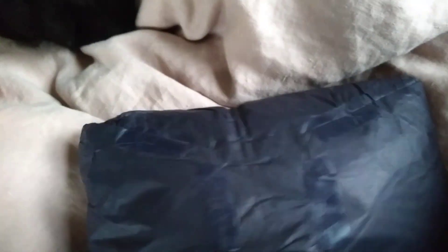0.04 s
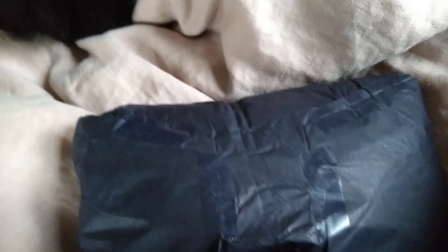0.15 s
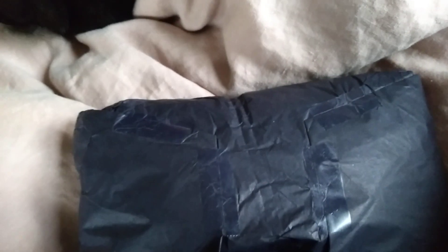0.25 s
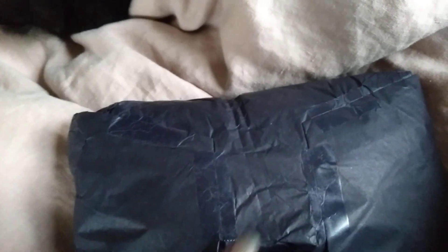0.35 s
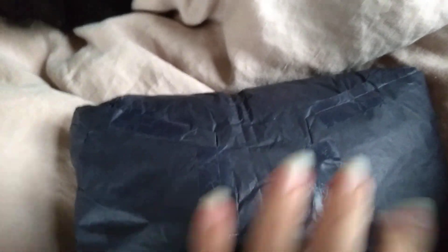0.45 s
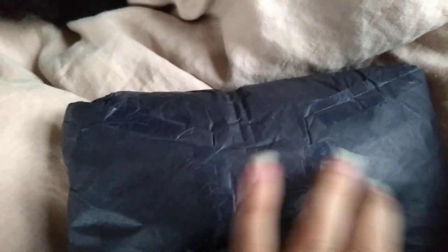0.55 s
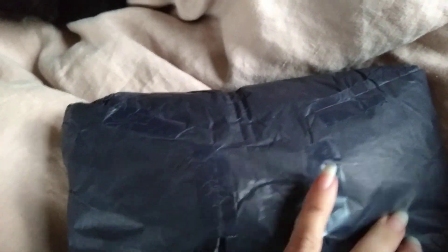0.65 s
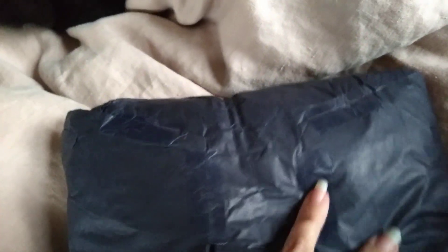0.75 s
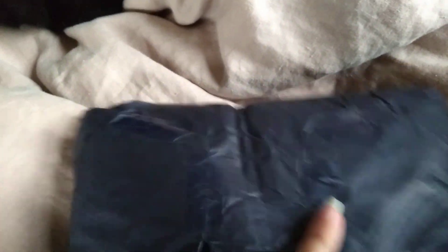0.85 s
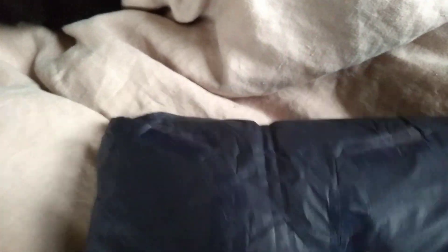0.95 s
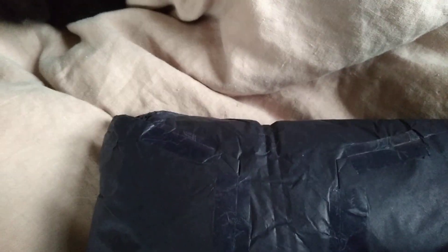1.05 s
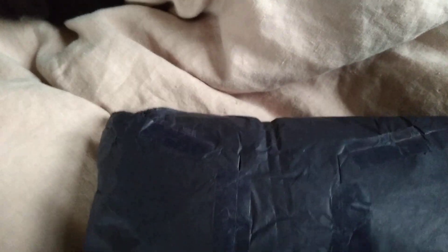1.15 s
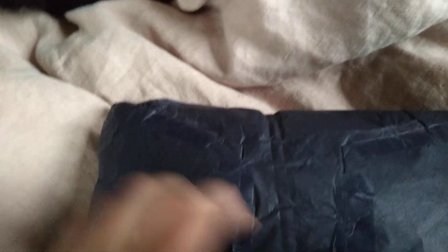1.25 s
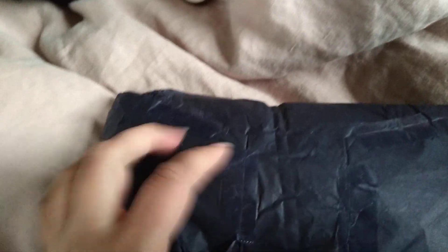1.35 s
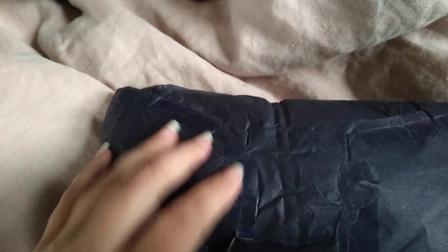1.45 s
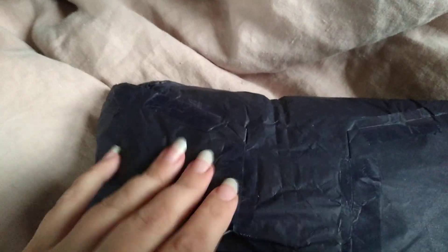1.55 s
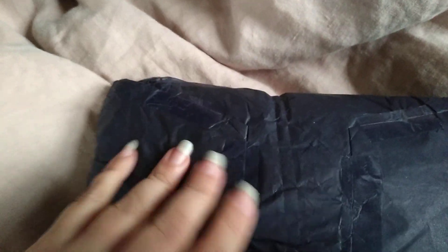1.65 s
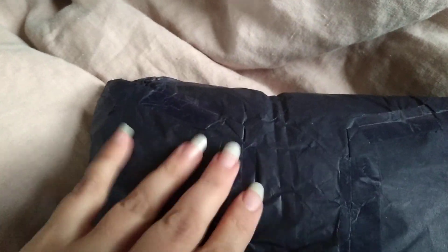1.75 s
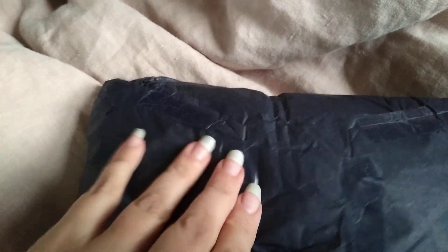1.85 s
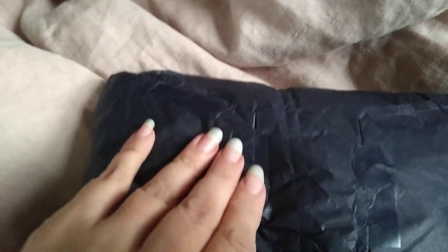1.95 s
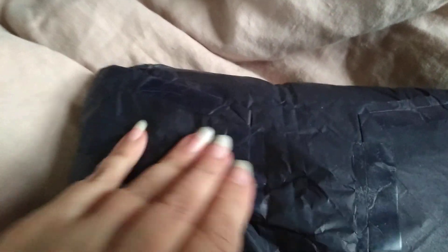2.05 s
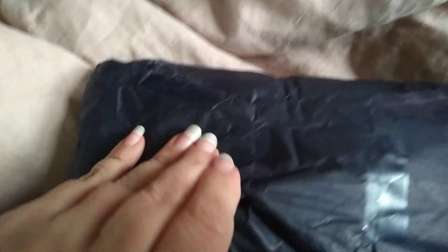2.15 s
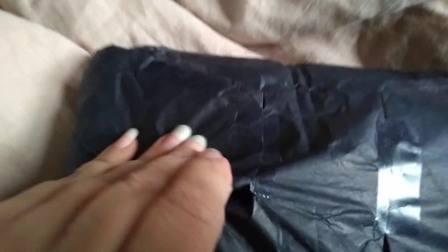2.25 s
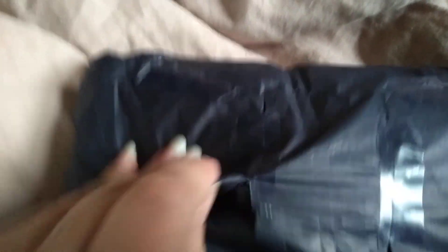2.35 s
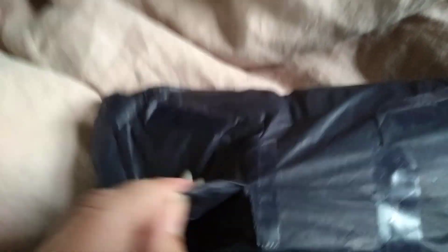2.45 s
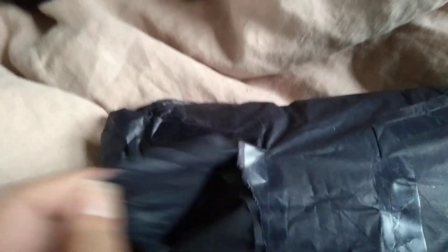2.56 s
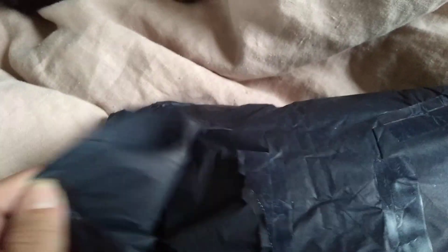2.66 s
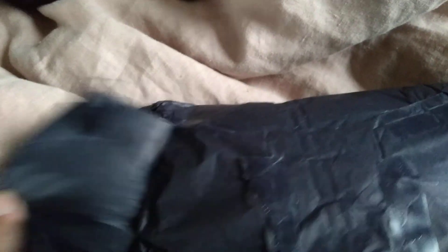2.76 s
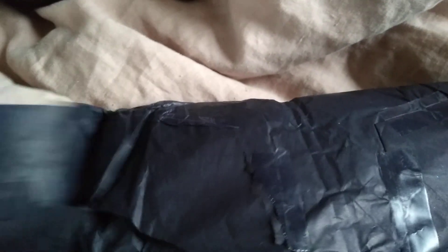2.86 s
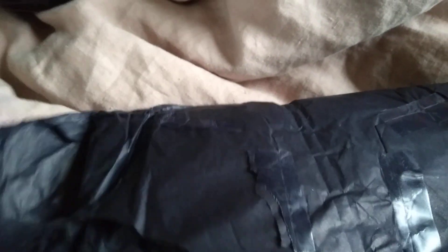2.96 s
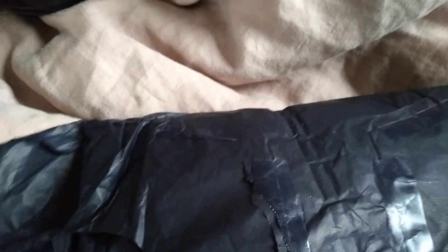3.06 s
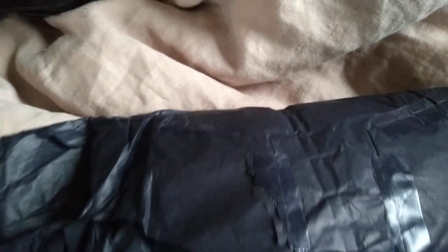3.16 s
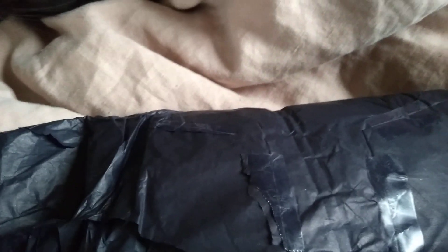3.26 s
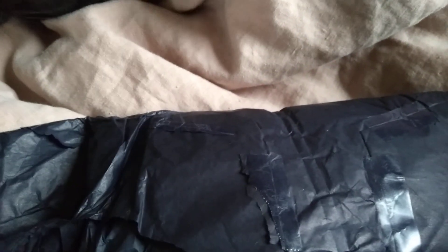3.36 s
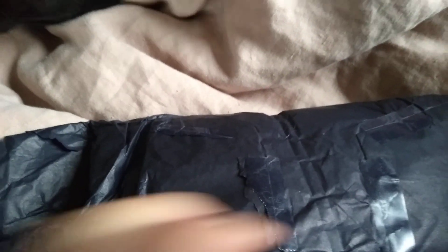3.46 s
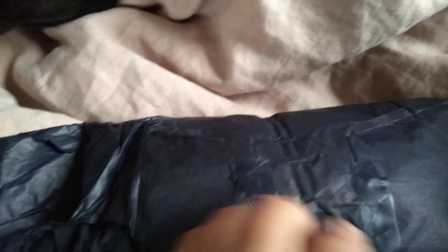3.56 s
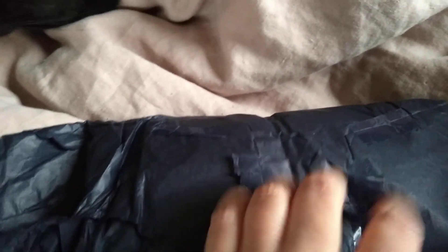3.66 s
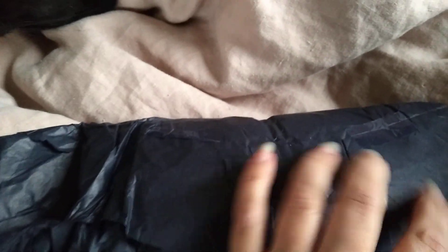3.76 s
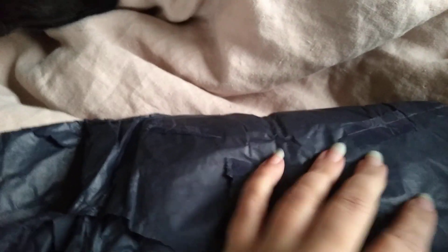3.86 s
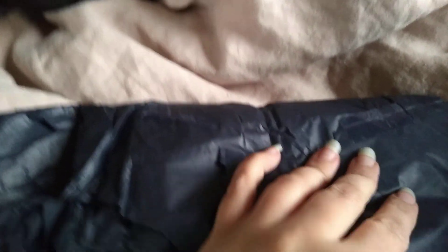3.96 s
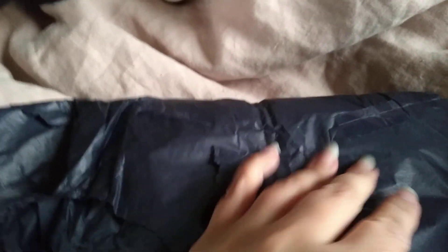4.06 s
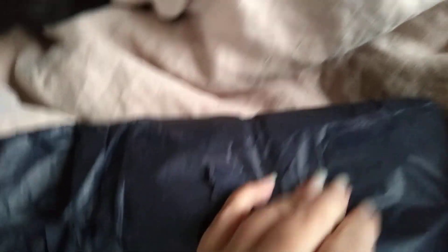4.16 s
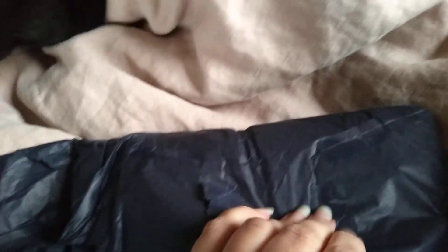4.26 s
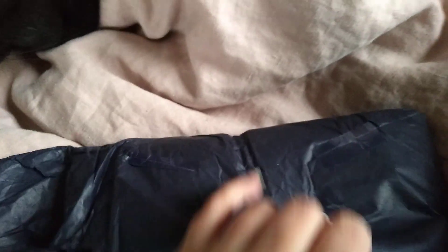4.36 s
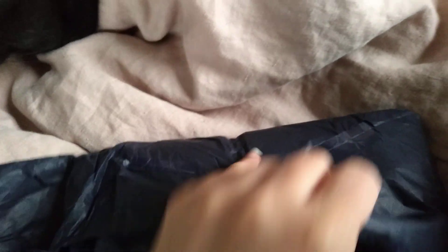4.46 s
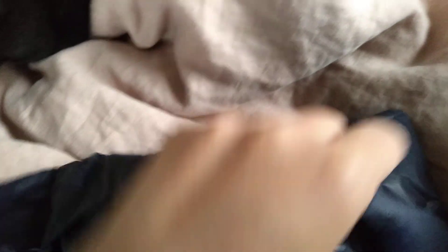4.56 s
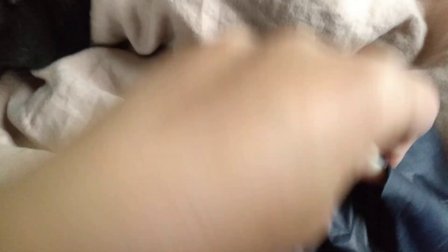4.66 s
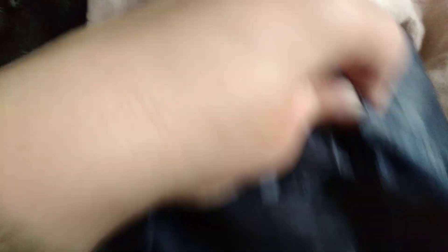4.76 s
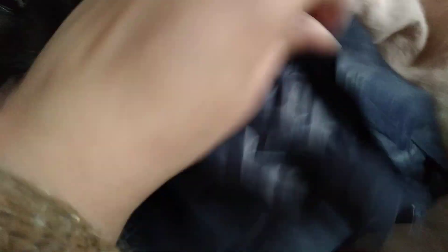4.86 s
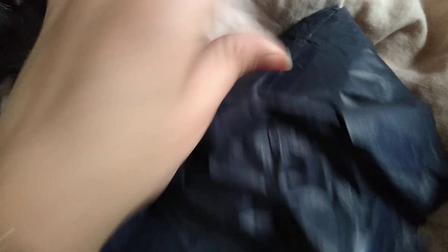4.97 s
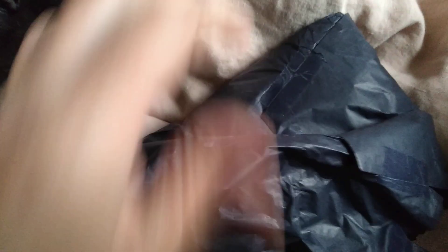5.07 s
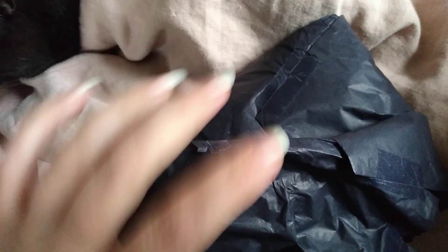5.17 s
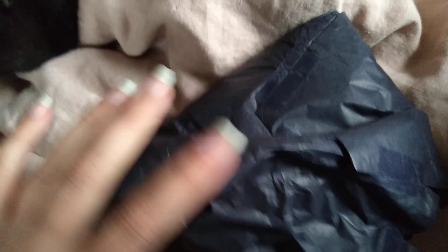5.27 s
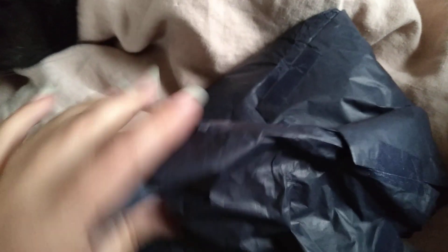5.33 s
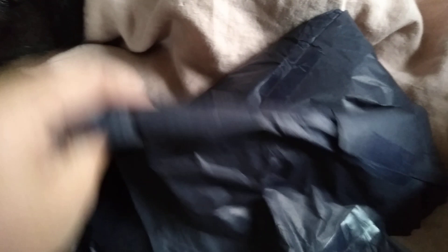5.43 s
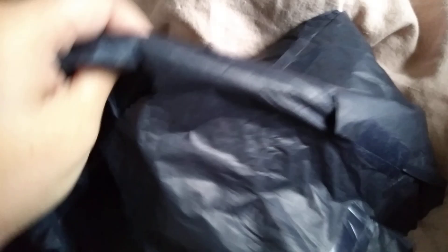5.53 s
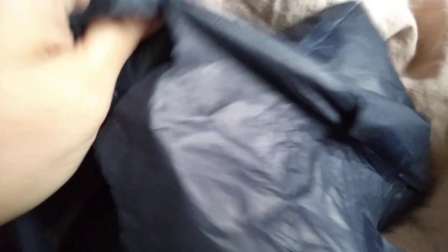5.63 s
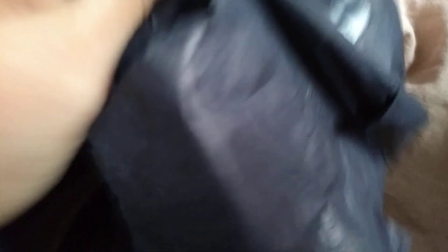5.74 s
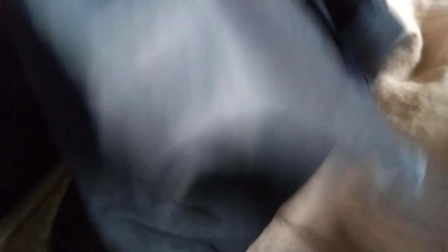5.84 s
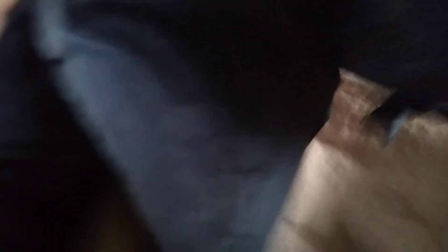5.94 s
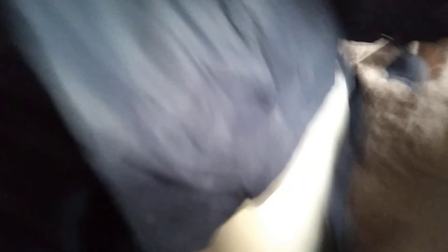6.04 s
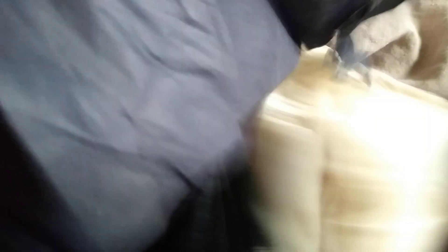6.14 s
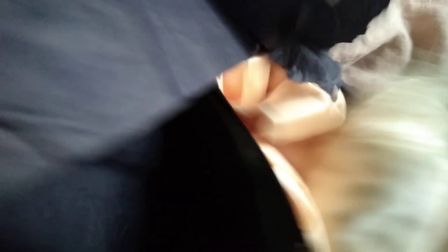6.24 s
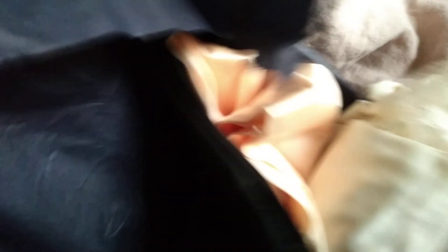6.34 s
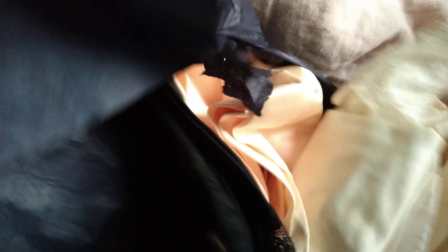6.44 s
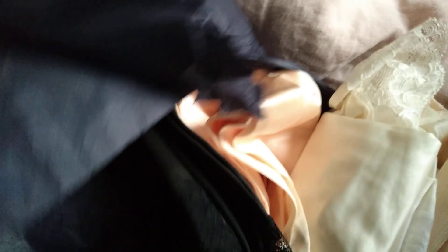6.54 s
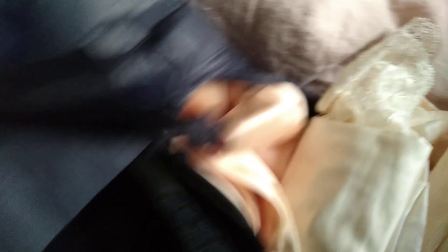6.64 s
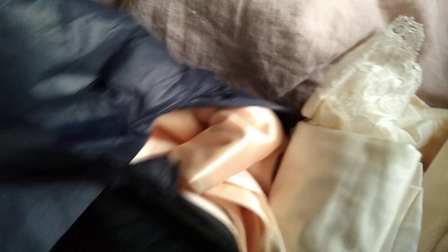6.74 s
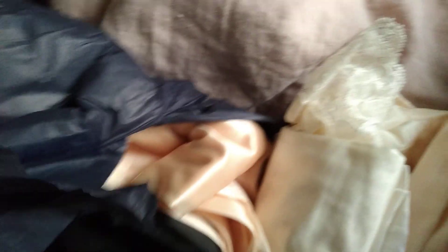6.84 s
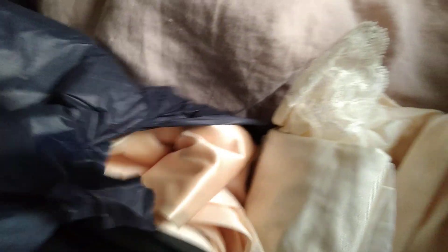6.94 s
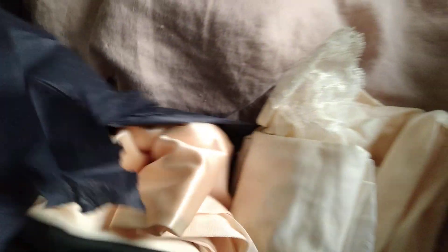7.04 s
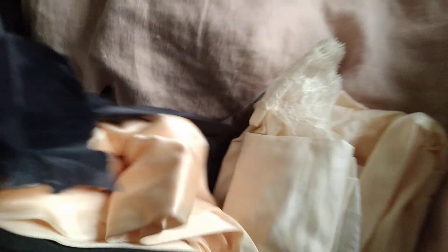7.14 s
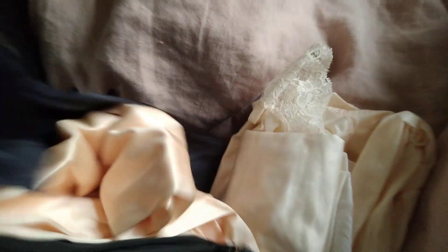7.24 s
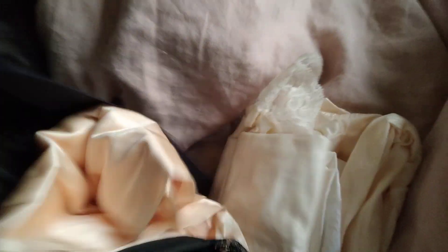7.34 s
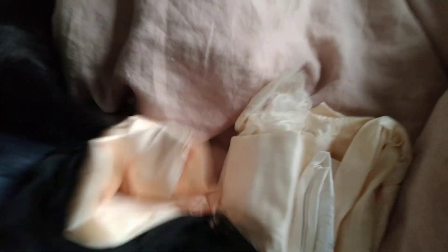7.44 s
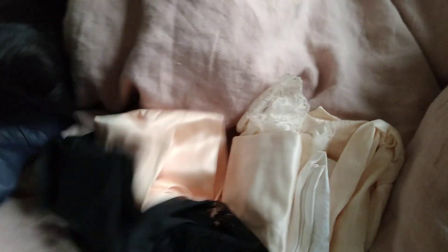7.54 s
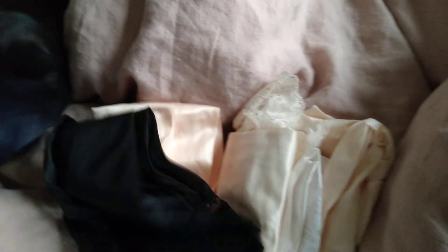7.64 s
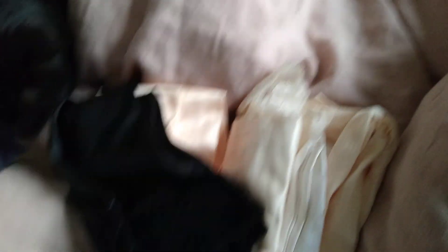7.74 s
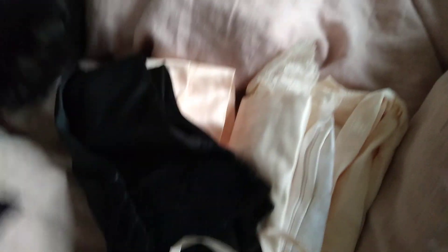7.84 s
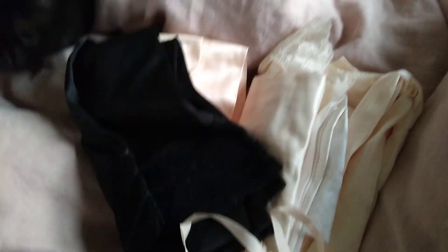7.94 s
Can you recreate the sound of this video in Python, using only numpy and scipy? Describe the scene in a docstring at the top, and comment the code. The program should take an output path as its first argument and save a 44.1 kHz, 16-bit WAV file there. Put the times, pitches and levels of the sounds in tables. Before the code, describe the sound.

A thin paper parcel is handled very close to a stereo microphone in a quiet, dry bedroom with still air and a barely audible low hum. From 0 to 0.9 seconds, short rustling strokes carry fine crackles, a soft pat and small fold snaps. From 1 to 2.1 seconds the hands smooth it more gently, with dull fingertip pats and faint sliding. At about 2.3 seconds the paper is tugged open: crisp, dense crackling and sharp snaps peak from 2.5 to 3.2 seconds. It drops to near-silence until about 3.6. Softer, hissing rubs and crinkles run from 3.6 to 5.1 seconds, with a dip near 5.2. From 5.4 to 6.2 seconds, big bright unfolding crackles and snaps return with low flaps of air. Looser, hollow rustling continues in waves, weakening after 7.5 seconds to a faint settling.

```python
"""Tissue-paper parcel on a bed

Hands smooth, tug open and unfold a tissue-paper parcel close to the microphone in a quiet bedroom.
Tiny creases buckle in clusters, layers slide and the loose sheet pushes air: noise shaped by each buckle.
Single folds snap and fingertips pat the paper as short decaying noise, over still air and a faint hum.
The arched sheet colours the sound, and the two ports of the microphone each have their own treble pitch."""
import sys
import numpy as np
from scipy import signal
from scipy.fft import rfft, irfft, next_fast_len
from scipy.io import wavfile
from scipy.ndimage import uniform_filter1d

SR = 44100
rng = np.random.default_rng(int(sys.argv[2]) if len(sys.argv) > 2 else 0)


def transcribe(u):
    """Save the signal u as a 16-bit wav file named by the first command-line argument.

    u: samples, shape (n,) or (channels, n), limited to [-1, 1]; the rate is SR.
    q: integer samples, one column per channel.
    """
    v = np.clip(np.atleast_2d(u).T, -1, 1)
    q = np.round(v * 32767).astype(np.int16)
    wavfile.write(sys.argv[1], SR, q)


N = 352787  # length of the scene in samples

# single folds snapping: t/s, relative level/dB, relative left-right place/dB (positive is left)
FOLD_SNAPS = [(0.0693, -16.5, -6), (0.2488, -13, -5), (0.4365, -15.5, 1), (0.527, -11, 7),
              (0.5475, -10.5, 5), (0.726, -7, 0), (0.7777, -6.5, 0.5), (1.1916, -18, -5), (1.502, -17, -9),
              (1.5674, -16, 0), (1.6741, -15.5, 12), (1.781, -21, -11), (1.8854, -25.5, 4),
              (2.2787, -9.5, 3), (2.3548, -11.5, 4.5), (2.4245, -12.5, 3), (2.4574, -7.5, -3),
              (2.4833, -4.5, 9), (2.5216, -2, 8), (2.5616, -5, 17), (2.63, -6, 8), (2.7734, -1.5, 5),
              (2.851, -1.5, -5), (3.0002, 2.5, 0), (3.034, -2, -3), (3.0634, -8, 0), (3.0743, -9, -4),
              (3.1013, -1, -2.5), (3.1392, -4, -5), (3.169, -11, -2), (3.3773, -35, 1.5), (3.41, -33, 0.5),
              (3.445, -45, 0), (3.4814, -53, 3.5), (3.5394, -38, -2), (3.603, -29, 3), (3.7742, -8, -3),
              (4.15, -8.5, -0.5), (4.1726, -11.5, -3), (4.2375, -15.5, 18.5), (4.366, -13, -4),
              (4.4124, -4.5, -3), (4.6539, -9, -7), (4.736, -10, 7), (5.2446, -21, 4), (5.456, -10, 1),
              (5.578, -9, -9), (5.687, -4, -5), (5.739, -9, -17), (5.8512, -5, -12), (5.945, -2.5, -6),
              (5.971, -6, -3), (5.9776, -6, -13), (6.0607, -6.5, -10), (6.1429, -8, -5), (6.4532, -15, -5),
              (6.7202, -10.5, 8.5), (6.774, -10, 6), (6.9006, -8, 0), (7.0901, -4, 1), (7.3302, -7.5, -1),
              (7.726, -14, -4), (7.892, -21, -6)]


def from_db(db):
    """Amplitude ratio of a level in dB."""
    return 10 ** (np.asarray(db) / 20)


def rms_one(x):
    """Scale to a root mean square of 1."""
    return x / np.sqrt(np.mean(x ** 2) + 1e-20)


def in_time(rows):
    """Each column of a curve, read off at every sample along straight lines between its points."""
    s, *columns = np.transpose(rows)
    t = np.arange(N) / SR
    return [np.interp(t, s, column) for column in columns]


def drift(rate):
    """Smooth chance with spread 1, heading for a new random value rate times a second."""
    knots = rng.standard_normal(8000)
    position = np.arange(N) / SR * rate
    return rms_one(np.interp(position, np.arange(len(knots)), knots))


def colour(x, spectrum):
    """Shape by a smooth spectrum over log frequency, keeping the power of white noise."""
    hz, db = np.transpose(spectrum)
    size = next_fast_len(N + 4096)
    bins = np.maximum(np.fft.rfftfreq(size, 1 / SR), 1)
    gain = rms_one(from_db(np.interp(np.log(bins), np.log(hz), db)))
    return irfft(rfft(x, size) * gain, size)[..., :N]


def air(alike):
    """White noise at the two ports; alike is the share of power common to both."""
    share = np.clip(alike, 0, 1)
    common = np.sqrt(share) * rng.standard_normal(N)
    return common + np.sqrt(1 - share) * rng.standard_normal((2, N))


def panned(db):
    """Left and right gains for a level difference; positive is left."""
    return from_db(np.array([[1], [-1]]) * db / 2)


def die_away(energy, t60):
    """Each packet of energy decays exponentially from its own height, by 60 dB in t60 seconds."""
    keep = from_db(-120 / (t60 * SR))   # energy left after one sample
    return signal.lfilter([1], [1, -keep], energy + 1e-18)


def peak(x, hz, width_hz, db):
    """One resonance, or a dip where db is negative, as a two-pole filter."""
    g = from_db(db / 2)
    k = np.tan(np.pi * width_hz / SR)
    c = -2 * np.cos(2 * np.pi * hz / SR)
    return signal.lfilter([1 + k * g, c, 1 - k * g], [1 + k / g, c, 1 - k / g], x)


def delayed(x, seconds):
    """Sound arriving over a longer path whose length may change."""
    return np.interp(np.arange(N) - seconds * SR, np.arange(N), x)


def strokes():
    """Each stroke takes hold, moves and lets go; overlapping strokes add power. Gives levels and place in dB."""
    # strokes of the hands: start t/s, length/s, swell over the stroke/dB, crackle of creases level/dB,
    # then levels relative to the crackle: sliding of layers/dB, drumming of panels/dB, flapping of the sheet/dB;
    # relative left-right place/dB
    stroke_rows = [(-0.033, 0.16, -11.5, -31, -10.0, -16.5, -26.5, -2),
                   (0.108, 0.27, 6.5, -32.5, -15.5, -18.0, -32, -1.5),
                   (0.403, 0.11, 0, -39.5, -27, -18, -26, 1),
                   (0.507, 0.13, -0.5, -31, -14.0, -16.5, -29, 6.5),
                   (0.61, 0.33, -0.5, -27, -9, -16.5, -31.0, 1),
                   (0.97, 0.28, 4.5, -34, -8.0, -13.5, -25.5, 0),
                   (1.25, 0.16, 5.5, -34, -14.5, -14.5, -25, 2.5),
                   (1.41, 0.12, 8.5, -40.5, -16.5, -16, -32, 3.5),
                   (1.539, 0.15, -7.5, -35, -13.5, -15.5, -30, 2.0),
                   (1.672, 0.27, -15.5, -44.5, -18.5, -18.5, -28.0, -1.5),
                   (1.912, 0.12, 12, -41.5, -12, -20, -31, 4),
                   (2.082, 0.38, 1.5, -35, -14.5, -21.0, -39, 3.0),
                   (2.398, 0.24, 11.5, -20.5, -15.5, -22.5, -33, 2.5),
                   (2.583, 0.11, -3.5, -14, -15, -22, -33, 2.0),
                   (2.677, 0.12, -9, -16.5, -15, -24, -34.5, -1),
                   (2.788, 0.13, 7, -20, -15.5, -24, -35.5, -2.5),
                   (2.917, 0.13, 6.5, -24.5, -12.0, -21.5, -40.0, -5),
                   (3.089, 0.11, 0, -32, -10.5, -25, -36.5, -5.5),
                   (3.588, 0.13, 13, -37.5, -10, -17.0, -24.5, 6),
                   (3.698, 0.095, 12.5, -30, -8.0, -17, -24, 6.5),
                   (3.819, 0.12, 0.5, -33.5, -8.5, -16, -32, 2.5),
                   (3.933, 0.16, -11.5, -31.0, -7.0, -16.0, -29, 4.5),
                   (4.104, 0.203, 8.5, -32, -5.5, -18, -32, 1), (4.31, 0.15, 8, -30.5, -9.5, -19, -31, 1.0),
                   (4.45, 0.21, -4, -31.5, -7.5, -18, -33, 0.5),
                   (4.572, 0.27, 13, -27.5, -7.5, -17.0, -31.5, 4.5),
                   (4.865, 0.13, 0.5, -28.0, -8.0, -18, -23, 1.5),
                   (5.017, 0.14, 2.5, -38, -9.5, -18, -32, 2.0),
                   (5.198, 0.14, 20, -47.5, -28, -23.0, -41, 7),
                   (5.284, 0.16, 3.0, -35.5, -12.5, -17, -54, 2),
                   (5.422, 0.17, 7.5, -23, -12.0, -25, -30, -0.5),
                   (5.554, 0.56, 2.0, -22, -11, -20.5, -26.5, -3.5),
                   (6.066, 0.13, 5, -21.5, -12.0, -20.5, -24, -3),
                   (6.206, 0.24, -15, -31, -9.5, -20, -24, -4),
                   (6.423, 0.23, -5.5, -28.5, -10.5, -20.5, -24.0, -2.0),
                   (6.626, 0.25, -0.5, -30.0, -10.5, -17.0, -24.5, -0.5),
                   (6.851, 0.26, -9.5, -29.5, -12.5, -23.5, -32.5, 1.5),
                   (7.007, 0.56, -4.5, -28, -10.5, -19.5, -26.5, -3.5),
                   (7.563, 0.29, -5.5, -41.5, -10, -22.5, -40, -4),
                   (7.882, 0.14, -12, -49.5, -9, -27, -31.5, -1)]
    attack_s, release_db_per_s = 0.036, 240
    linger_db, linger_db_per_s = -32, 61.5   # a faint part lingers while the paper relaxes
    ease_db = 3.5   # the hand is fastest in mid-stroke; both ends are weaker by this much

    t = np.arange(0, N / SR, .001)
    columns = np.transpose(stroke_rows)[..., None]
    start, length, swell_db, crackle_db, slide_db, panel_db, flap_db, pan_db = columns
    held = np.clip((t - start) / length, 0, 1)
    after = np.maximum(t - start - length, 0)
    attack = np.clip((t - start) / attack_s, 0, 1)
    release = from_db(-release_db_per_s * after) + from_db(linger_db - linger_db_per_s * after)
    speed_db = swell_db * (held - .5) - ease_db * (2 * held - 1) ** 2
    power = (attack * from_db(crackle_db + speed_db) * release) ** 2 + 1e-14
    levels = []
    for part_db in (0, slide_db, panel_db, flap_db):
        part_power = (power * from_db(part_db) ** 2).sum(0)
        levels.append(10 * np.log10(part_power))
    place_db = (power * pan_db).sum(0) / power.sum(0)   # the stronger stroke decides the place
    return in_time(np.transpose([t, *levels, place_db]))


def buckles(per_s, spread_db, cluster_db):
    """Energy of creases giving way: many small, a few large, their size swelling in short avalanches."""
    born = rng.random(N) < per_s / SR
    size_db = spread_db * np.minimum(rng.exponential(1, N), 4)
    avalanche_db = cluster_db * np.tanh((drift(110) + drift(320)) / 2)
    # every facet of the paper faces one port more than the other
    facet = panned(3.6 * rng.standard_normal(N))
    return born * from_db(size_db + avalanche_db) ** 2 * facet ** 2


def shiver(energy, t60, smooth):
    """Amplitude of the sheet after each buckle, over a share of even friction; mean power about 1."""
    ringing = die_away(energy, t60)
    usual = uniform_filter1d(uniform_filter1d(ringing.mean(0), size=2600), size=1800)
    share = np.clip(smooth, 0, 1)
    return np.sqrt((1 - share) * ringing / (np.abs(usual) + 1e-12) + share)


def sheet_swing(flaps):
    """Wrapped tight, the paper drums higher; hanging loose, it swings deep."""
    # how freely the sheet swings: t/s, looseness 0-1
    looseness = [(0, 1), (2.4, 0.64), (3.1, 0.65), (3.6, 0.04), (4.45, 0.05), (4.75, 0.9), (8, 1)]
    # colour of the pushed air: f/Hz, relative level/dB per Hz
    flap_colour = [(20, -46), (40, -26), (60, -12.5), (85, -1.5), (130, -0.5), (220, -2), (350, -10),
                   (800, -9.5), (3000, -61.5)]
    loose, = in_time(looseness)
    deep = colour(flaps, flap_colour)
    tight = peak(peak(deep, 65, 90, -13.5), 215, 110, 5.7)
    return tight + np.clip(loose, 0, 1) * (deep - tight)


def rustle(arch):
    """The same buckles shake creases, layers and panels; the larger the part, the longer it rings."""
    # smoothed paper sounds soft, pulled paper crisp: t/s, crispness of the creases level/dB
    crispness = [(0, -17), (1.0, -26), (1.7, -12), (2.0, -19), (2.35, -8.5), (3.3, -9), (3.8, -16),
                 (4.4, -16), (4.9, -9), (6.4, -9), (6.95, -15), (8, -8)]
    # colours of creases, crisp creases, sliding layers and drumming panels: f/Hz, relative level/dB per Hz
    crackle_colour = [(300, -26), (1500, -24.5), (4000, -9.5), (5500, -8), (7000, -0.5), (9000, -0.5),
                      (11000, 0.5), (13000, -7.5), (16000, -10.5)]
    crisp_colour = [(6000, -46), (10000, -21.5), (12000, 1), (14000, 4), (16000, -1)]
    slide_colour = [(200, -42), (800, -10), (1500, -2.5), (2600, 0.5), (4300, 0), (6000, -5), (9000, -26),
                    (16000, -16)]
    panel_colour = [(40, -45), (150, -14.5), (300, 0), (470, -1.5), (720, 4.5), (1200, -3), (2000, -3),
                    (5000, -58)]
    # gain of each part for the same stroke
    crackle_gain_db, slide_gain_db, panel_gain_db, flap_gain_db = -4.5, 0.1, 2.2, 2

    crackle_db, slide_db, panel_db, flap_db, pan_db = strokes()
    crisp_db, = in_time(crispness)
    # harder handling buckles more creases; let go, the paper mostly hisses as it settles
    energy = buckles(per_s=1350 * from_db(0.37 * (crackle_db + 31)), spread_db=3.0, cluster_db=3.5)
    settling = np.interp(crackle_db, [-66, -54], [.8, 0])

    creases = shiver(energy, t60=0.004, smooth=0.28 + settling)
    creases = creases * from_db(crackle_db - 4.6 * settling) * panned(0.86 * pan_db + 0.73)
    crackle = from_db(crackle_gain_db) * colour(creases * air(0.026), crackle_colour)
    crisp = colour(creases * from_db(crisp_db) * air(.07), crisp_colour)

    layers = shiver(energy, t60=0.017, smooth=0.38 + settling)
    layers = layers * from_db(slide_db + slide_gain_db) * panned(.5 * pan_db - .5)
    panels = shiver(energy, t60=0.022, smooth=0.081)
    panels = panels * from_db(panel_db + panel_gain_db) * panned(0.48 * pan_db - .8)
    flaps = shiver(energy, t60=0.088, smooth=.2)
    flaps = flaps * from_db(flap_db + flap_gain_db) * panned(0.54 * pan_db - 1.5)

    sliding = colour(layers * air(0.18), slide_colour)
    drumming = colour(panels * air(0.96), panel_colour)
    left, right = sliding + drumming + sheet_swing(flaps * air(0.94))
    # the raised sheet lies nearer to the right port, so its sound reaches the left one later
    return crackle + crisp + np.array([delayed(left, 0.00035 * arch), right])


def grip():
    """Gain of the rustle: the hand is uneven, and a snap takes up the strain so the rustle thins around it."""
    lull_s, lull_db = 0.01, -0.5
    uneven_db, uneven_per_s = 0.66, 16
    t = np.arange(N) / SR
    coarse_t = t[::40]
    snap_s = np.array(FOLD_SNAPS)[:, 0]
    near = np.exp(-((coarse_t[:, None] - snap_s) / lull_s) ** 2).max(1)
    return from_db(lull_db * np.interp(t, coarse_t, near) + uneven_db * drift(uneven_per_s))


def room_tone():
    """Still air as shaped noise, and a faint hum with its octave, louder at first, then weaker."""
    # still air of the room: f/Hz, relative level/dB per Hz
    room_colour = [(20, -17), (60, 7), (130, 7), (300, -7), (600, -13.5), (2000, -17.5), (8000, -30),
                   (16000, -38.5)]
    # level of the low hum over time: t/s, level/dB relative to hum_db
    hum_level = [(0, 4), (1.5, 16), (2.0, 5), (3.5, -4.5), (5.2, -1), (8, 2.5)]
    hum_hz, hum_db, octave_db, room_db = 130.7, -78, -11.5, -82
    level_db, = in_time(hum_level)
    phase = 2 * np.pi * hum_hz * np.arange(N) / SR + .5 * drift(9.7)
    fundamental = from_db(level_db) * np.sin(phase)
    octave = from_db(octave_db) * np.sin(2 * phase)
    hum = np.sqrt(2) * (fundamental + octave)
    return from_db(room_db) * colour(air(.6), room_colour) + from_db(hum_db) * hum


def snaps():
    """A fold flips: a sharp crack, its neighbour gives way a moment later, and the sheet shivers on."""
    # colour of a snap: f/Hz, relative level/dB per Hz
    snap_colour = [(40, -38), (200, -7), (1000, -3), (2500, -4), (5000, -2.5), (7500, 7.5), (11000, 8.5),
                   (16000, -2)]
    energy = np.zeros((2, N))
    chances = rng.random((len(FOLD_SNAPS), 2))
    for (s, db, pan_db), (gap, size) in zip(FOLD_SNAPS, chances):
        first = int((s + .0007) * SR)
        second = first + int((.0004 + 0.0018 * gap) * SR)
        strength = (from_db(db - 11.5) * panned(1.3 * pan_db)[:, 0]) ** 2
        energy[:, first] += strength
        energy[:, second] += strength * (0.22 + 0.45 * size)
    # the energy of each crack is spread over under a millisecond
    energy = np.maximum(uniform_filter1d(energy, size=32), 0)
    crack = die_away(energy, t60=0.0064)
    sheet = from_db(-53) * die_away(energy, t60=0.13)
    return colour(np.sqrt(crack + sheet) * air(0.18), snap_colour)


def pats():
    """A fingertip lands on the padded paper: a short dull knock of decaying noise."""
    # fingertips patting the parcel: t/s, relative level/dB
    pat_rows = [(0.198, -32), (1.344, -29.5), (1.392, -35), (1.582, -47), (3.678, -35), (4.415, -33)]
    # their dull colour: f/Hz, relative level/dB per Hz
    pat_colour = [(40, -25.5), (130, -3), (350, -5.5), (800, -0.5), (1500, -10), (3000, -23), (8000, -53)]
    energy = np.zeros(N)
    for s, db in pat_rows:
        energy[int(s * SR)] = from_db(db - 5.0) ** 2
    return colour(np.sqrt(die_away(energy, t60=0.045)) * air(0.95), pat_colour)


def pocket(x, ratio):
    """The hollow colour of the arched sheet, with all its pitches scaled by ratio."""
    # resonances and dips of the pocket at ratio 1: f/Hz, width/Hz, level/dB
    pocket_modes = [(482, 67, 0), (1594, 530, -5.5), (2410, 970, 5.5), (3500, 990, -2), (5830, 1120, 3)]
    for hz, width_hz, db in pocket_modes:
        x = peak(x, hz * ratio, width_hz, db)
    return x


def surroundings(x, arch, bounce):
    """A moving hand reflects the sound from close by; the arched sheet makes it hollow."""
    opens_s, small_pocket_ratio = 3.8, 1.11   # until the parcel opens the pocket is smaller and rings higher
    ports = []
    for port in x:
        path_s = 0.000693 * from_db(2.66 * drift(4))
        ports.append(port + bounce * delayed(port, path_s))
    x = np.array(ports)
    opened = np.clip((np.arange(N) / SR - opens_s) * 2, 0, 1)
    hollow = (1 - opened) * pocket(x, small_pocket_ratio) + opened * pocket(x, 1)
    return (x + np.clip(arch, 0, 1) * (hollow - x)) / np.sqrt(1 + bounce ** 2)


def room_tail(x, t60, wet_db):
    """The soft bedroom returns a weak, short wash: convolution with decaying noise."""
    t = np.arange(SR // 2) / SR
    tail = rng.standard_normal((2, len(t))) * from_db(-60 * t / t60) * (t > .004)
    tail = rms_one(tail) / np.sqrt(len(t))   # unit energy
    return from_db(wet_db) * signal.fftconvolve(x, tail, axes=1)[:, :N]


def scene():
    """The parcel close by, in a quiet bedroom."""
    # how far the sheet arches into a pocket in front of the microphone: t/s, arch 0-1
    arch_curve = [(0, 0.36), (.5, 0.54), (1.5, 0), (2.3, 0.29), (3.0, 0.86), (3.3, 1), (3.6, .2),
                  (5.2, 0.18), (5.6, 0.78), (6.3, 0.49), (6.7, 0.9), (8, 0.92)]
    arch, = in_time(arch_curve)
    handling = rustle(arch) * grip() + snaps() + pats()
    paper = surroundings(handling, arch, bounce=0.31)
    return paper + room_tail(paper, t60=0.1, wet_db=-27) + room_tone()


def record(dry):
    """Each microphone port adds its resonances and dips and clips at full scale; a steep low-pass cuts the top."""
    # resonances and dips of the microphone ports: f/Hz, width/Hz, level/dB
    left_port = [(2470, 3200, 3), (5900, 2500, -7.5), (8150, 4000, 10), (11060, 1100, -7)]
    right_port = [(2730, 1100, -3.5), (7200, 3200, -3), (10160, 2600, 12)]
    cutoff_hz = 15900
    ports = []
    for x, resonances in zip(dry, (left_port, right_port)):
        for hz, width_hz, db in resonances:
            x = peak(x, hz, width_hz, db)
        ports.append(np.clip(x, -1, 1))
    low_pass = signal.ellip(12, .1, 80, cutoff_hz, fs=SR, output="sos")
    return signal.sosfilt(low_pass, ports)


dry = scene()
out = record(dry)
transcribe(out)
```